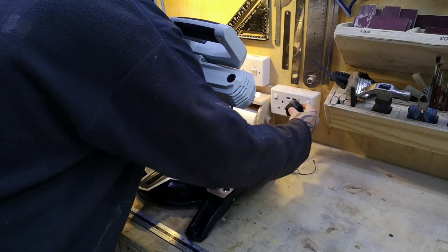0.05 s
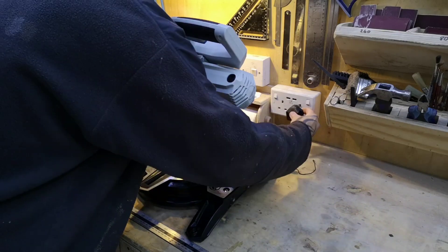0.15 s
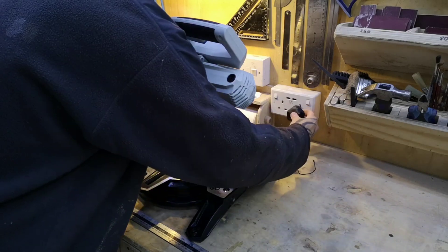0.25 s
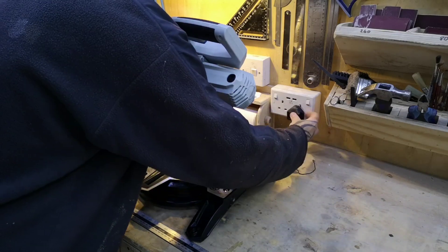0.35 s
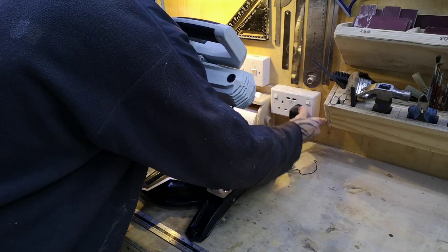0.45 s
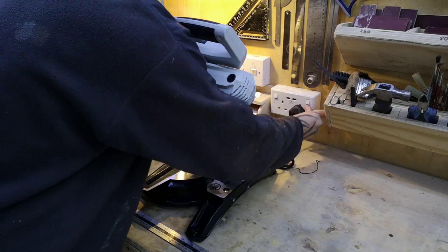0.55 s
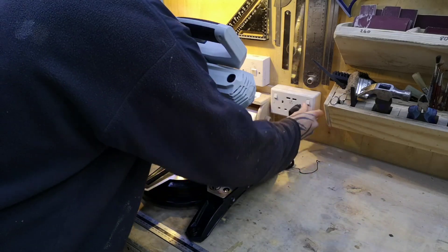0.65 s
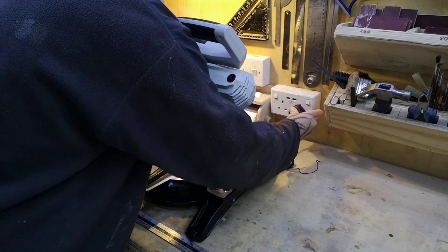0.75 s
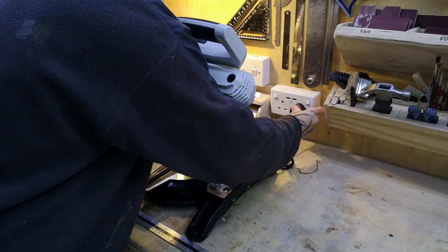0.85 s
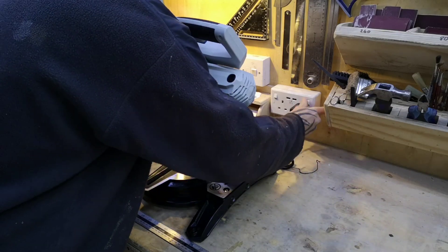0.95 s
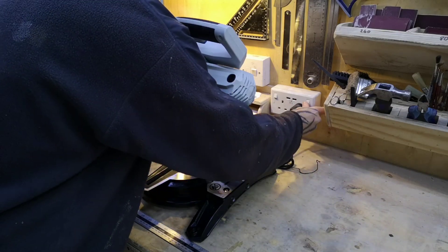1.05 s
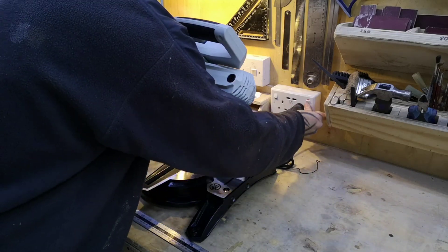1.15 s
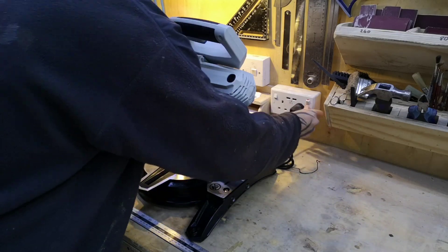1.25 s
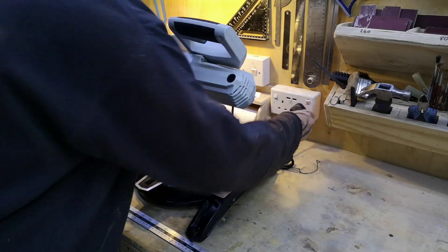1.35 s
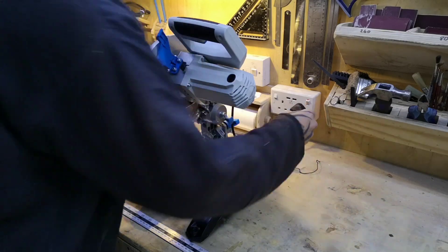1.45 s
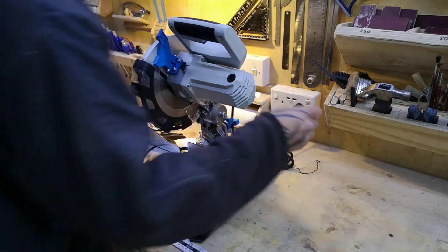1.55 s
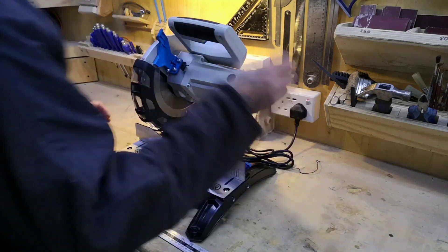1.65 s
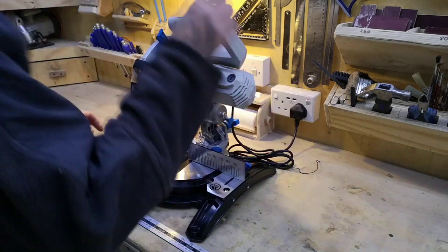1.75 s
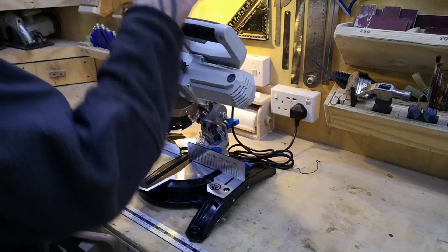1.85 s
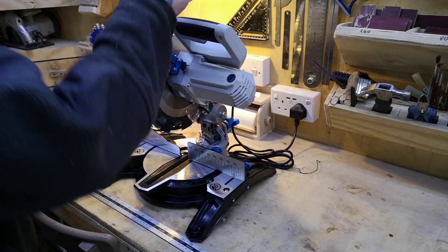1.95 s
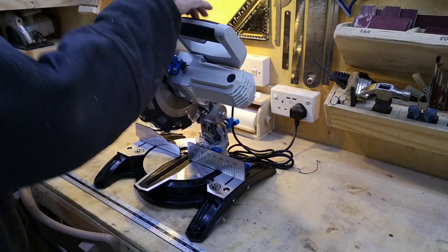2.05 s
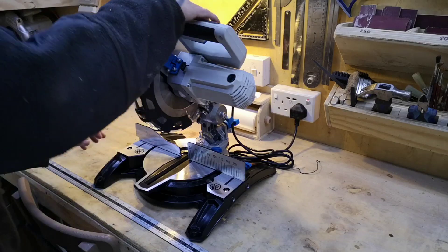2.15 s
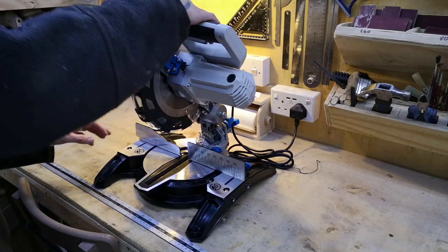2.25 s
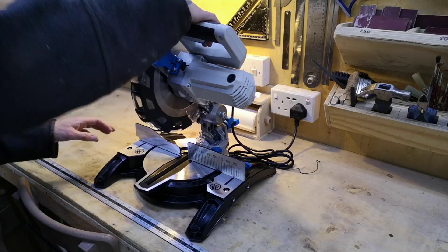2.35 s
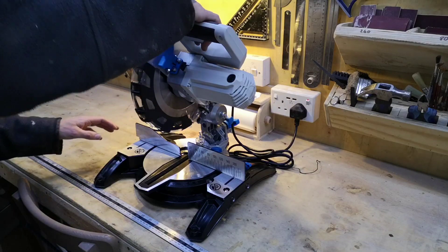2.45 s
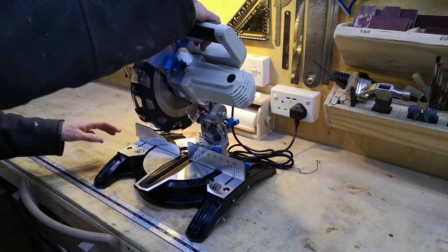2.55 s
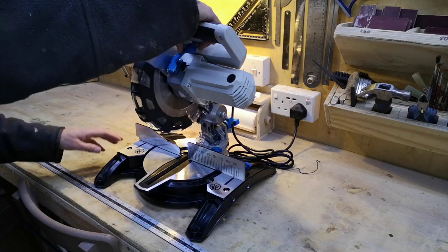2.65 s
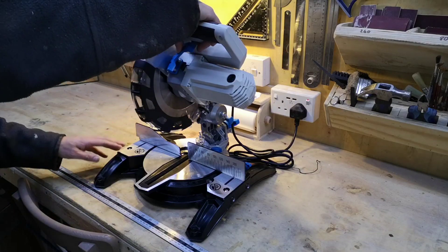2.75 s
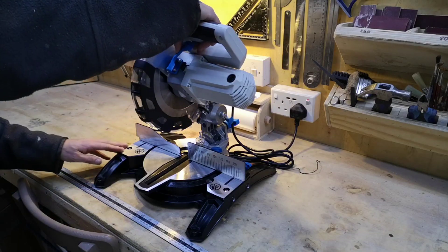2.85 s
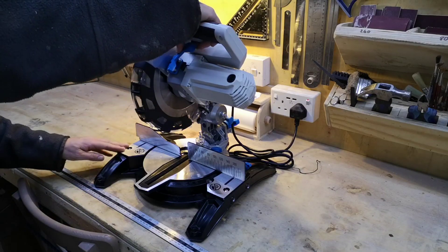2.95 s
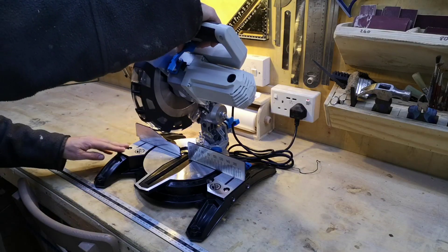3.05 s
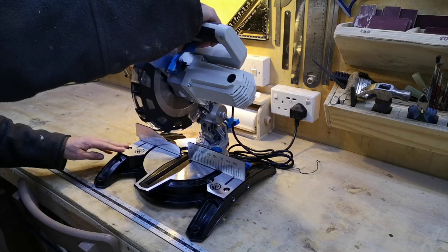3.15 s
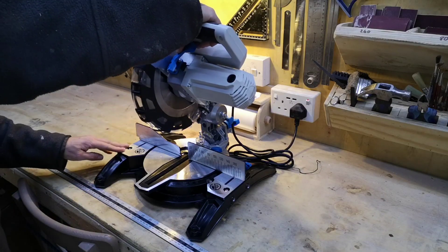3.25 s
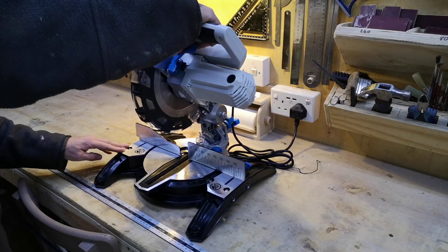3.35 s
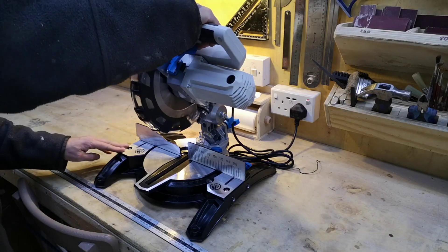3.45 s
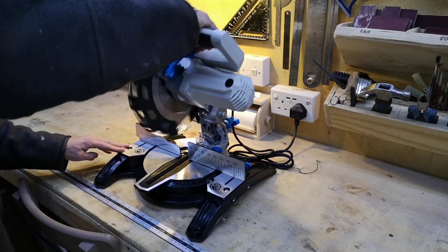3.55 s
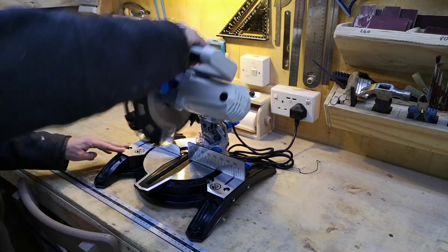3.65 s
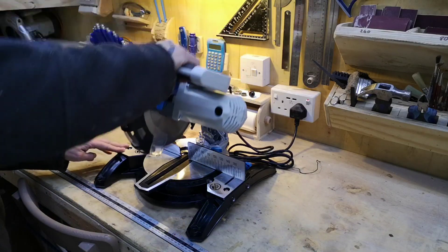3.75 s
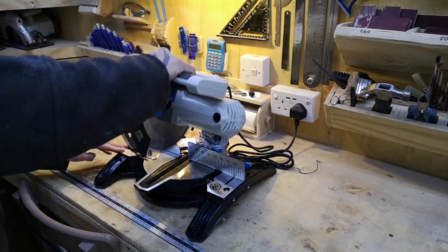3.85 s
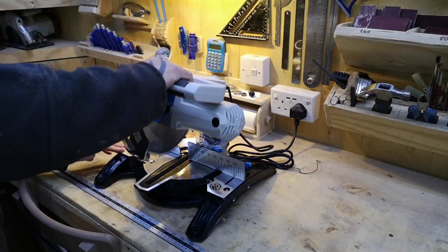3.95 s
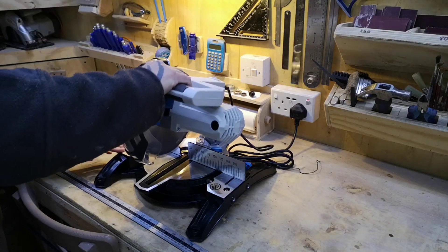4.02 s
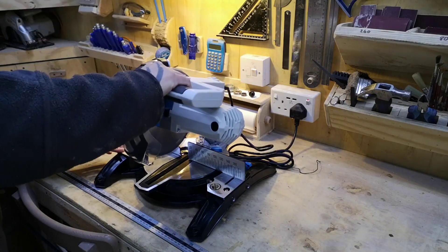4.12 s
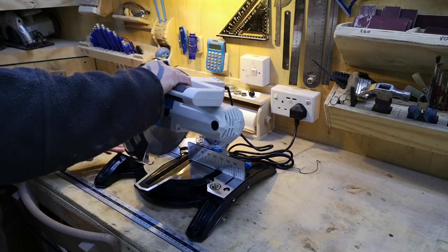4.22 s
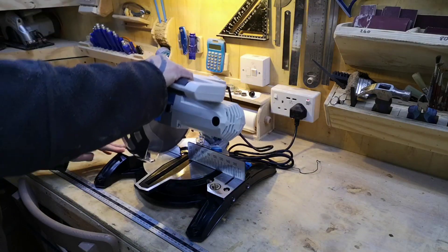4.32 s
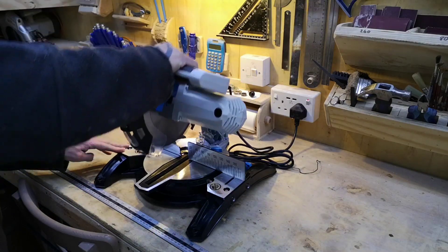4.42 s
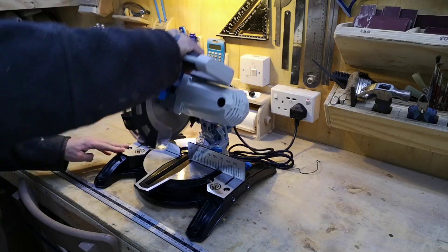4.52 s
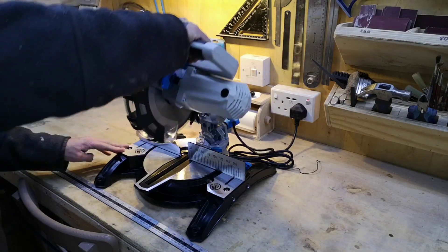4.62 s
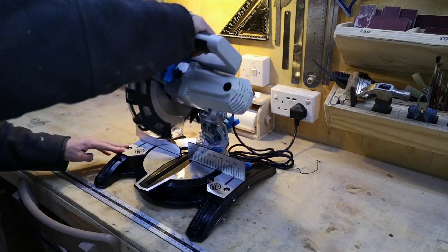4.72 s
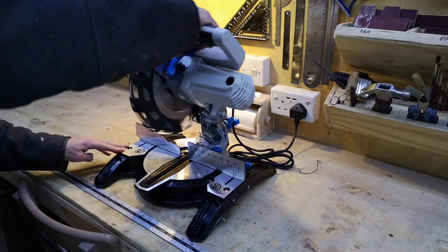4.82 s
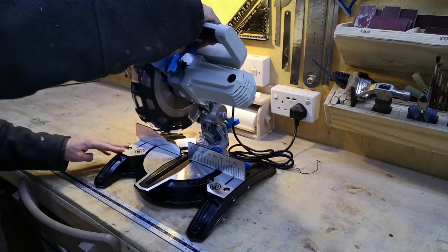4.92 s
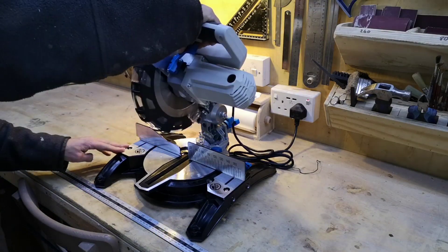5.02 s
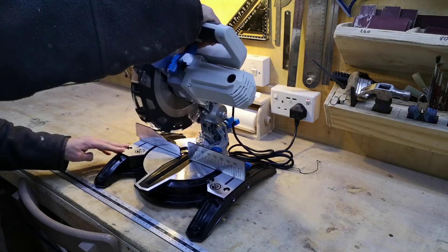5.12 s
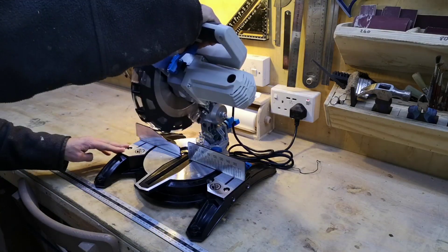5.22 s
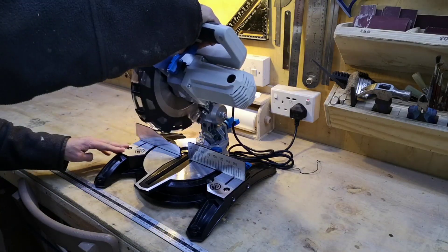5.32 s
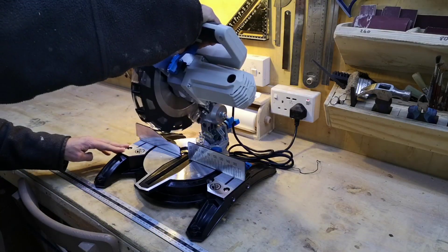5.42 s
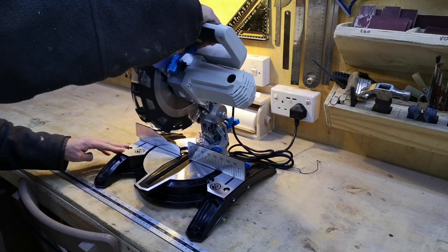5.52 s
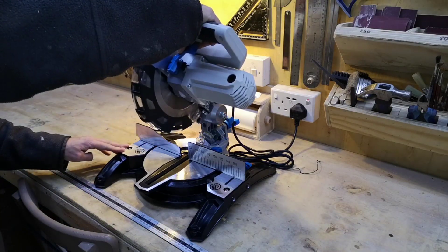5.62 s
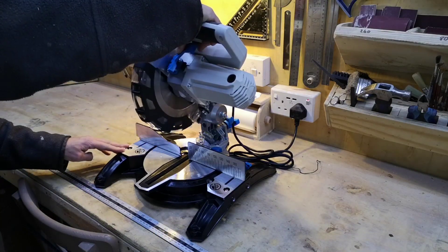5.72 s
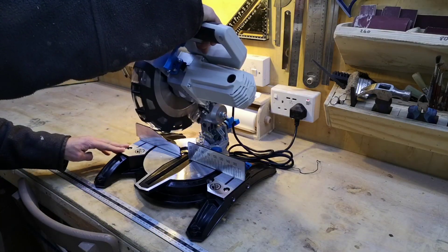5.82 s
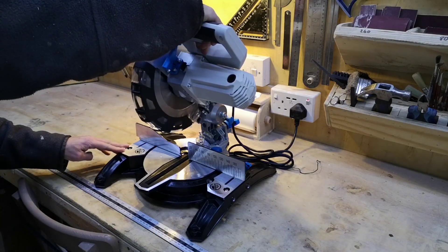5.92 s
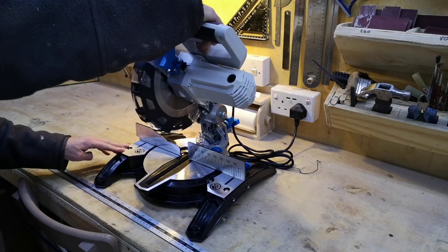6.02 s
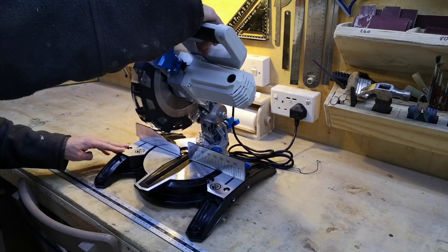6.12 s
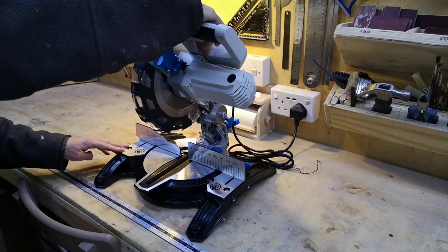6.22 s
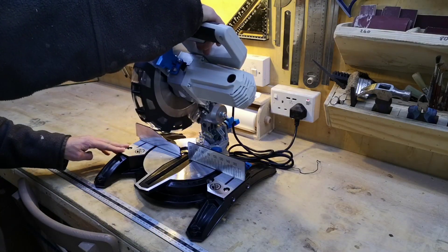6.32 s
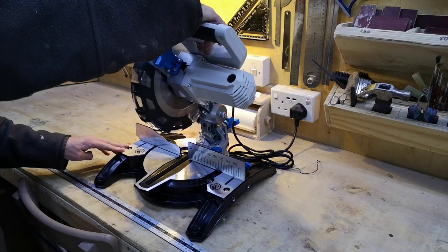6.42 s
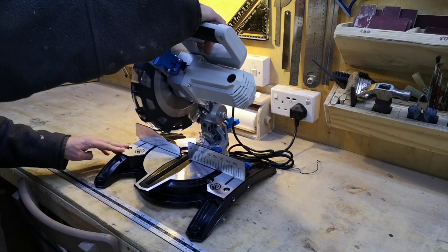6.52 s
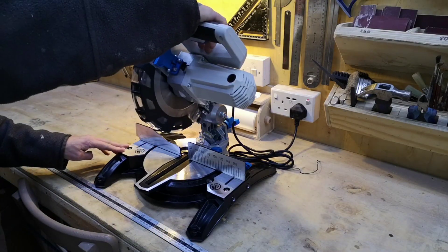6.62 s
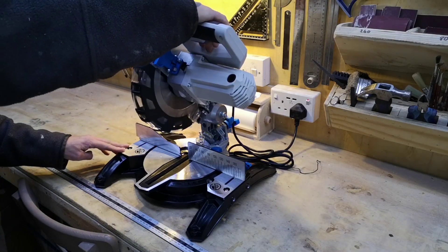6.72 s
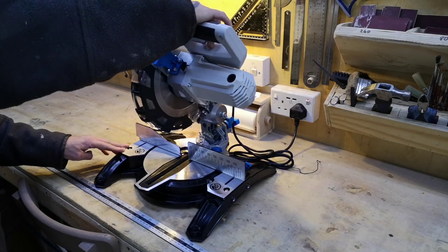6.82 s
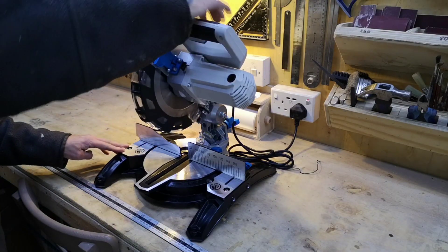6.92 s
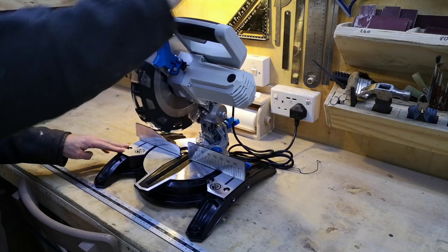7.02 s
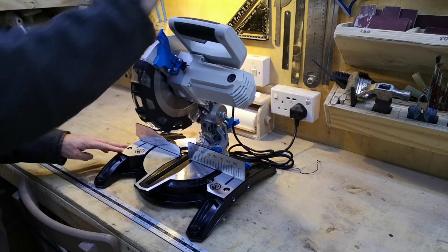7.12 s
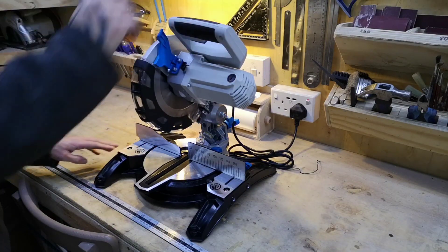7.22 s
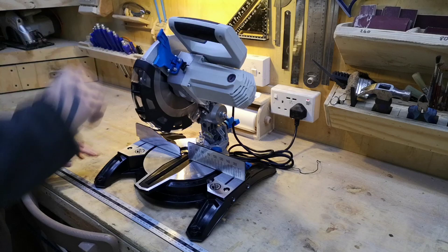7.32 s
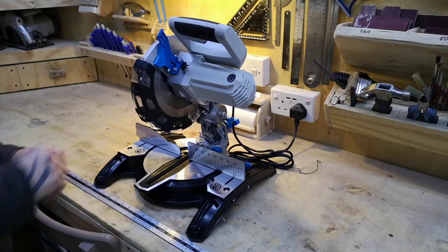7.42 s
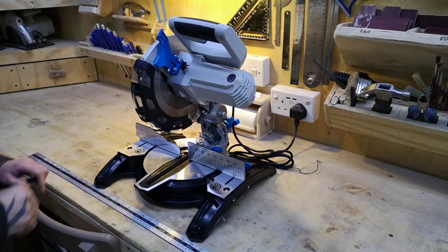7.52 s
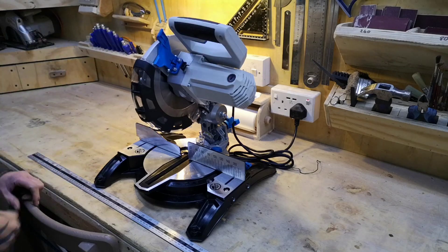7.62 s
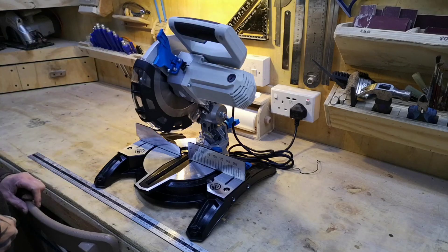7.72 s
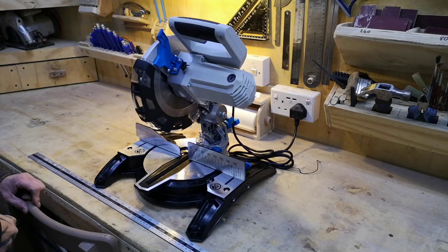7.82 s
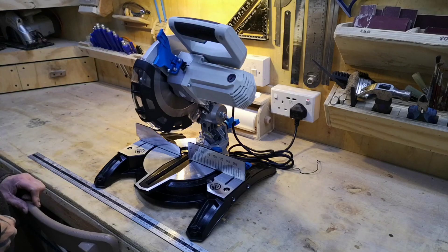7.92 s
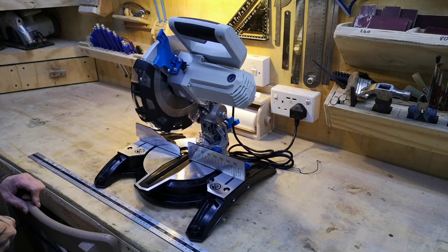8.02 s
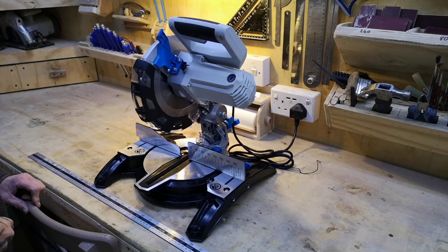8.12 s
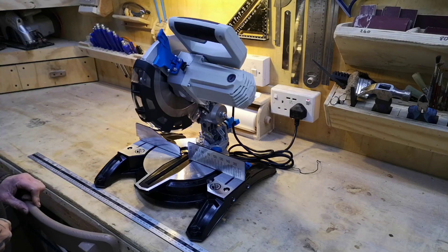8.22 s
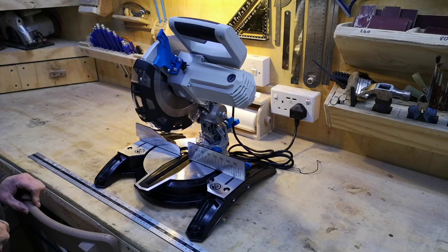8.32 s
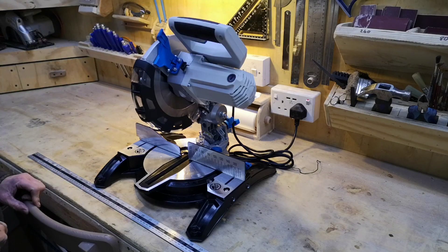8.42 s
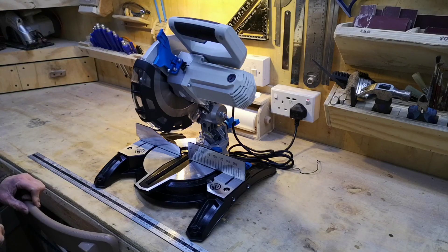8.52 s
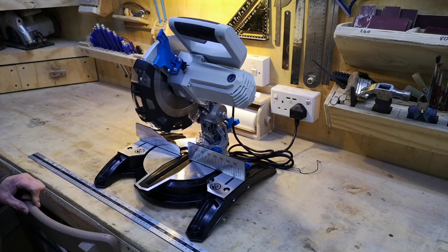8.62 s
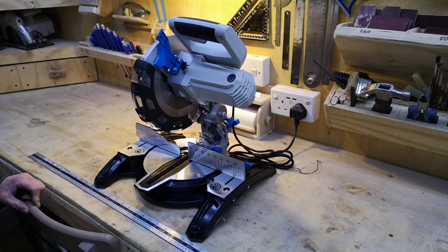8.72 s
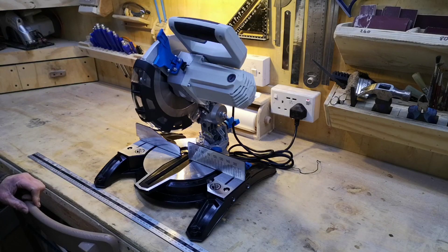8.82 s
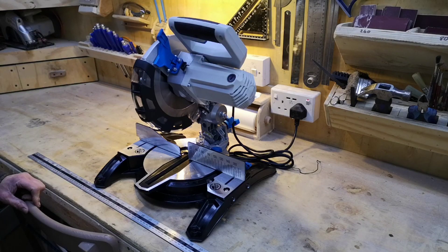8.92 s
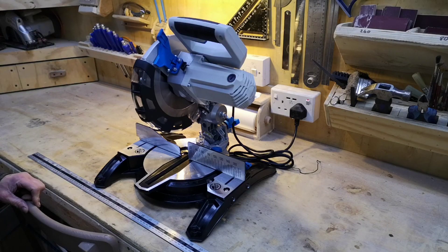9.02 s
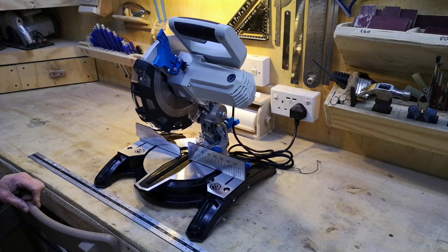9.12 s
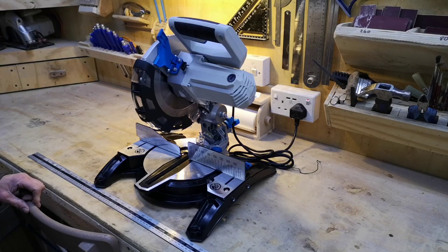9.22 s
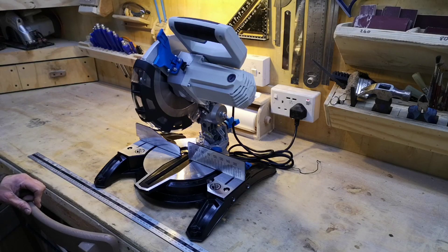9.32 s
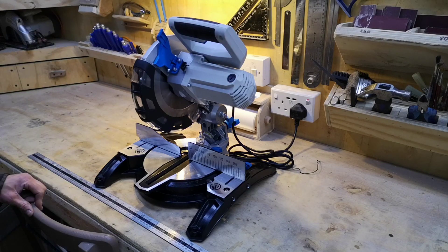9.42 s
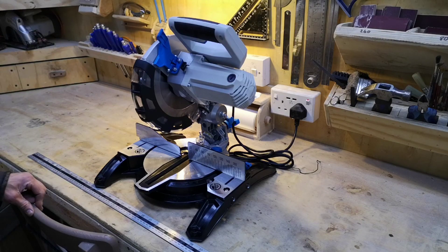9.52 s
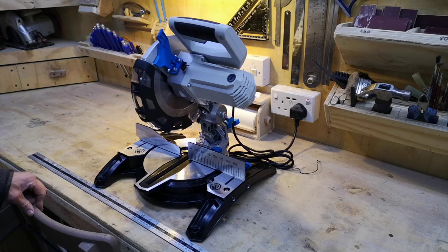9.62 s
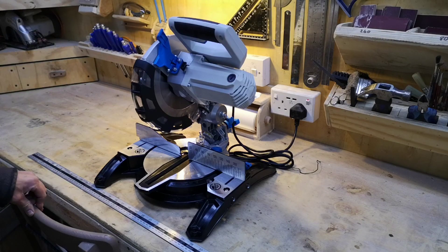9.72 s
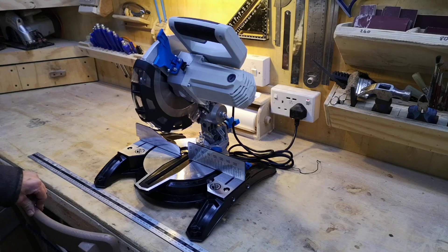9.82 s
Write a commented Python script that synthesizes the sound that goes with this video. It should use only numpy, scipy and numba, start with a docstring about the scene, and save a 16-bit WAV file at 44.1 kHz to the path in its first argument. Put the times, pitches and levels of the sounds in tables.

```python
"""A sleeve rustles and a plug scrapes and knocks into a wall socket above a wooden workshop bench.
The socket's switch snaps over; a mitre saw starts with a clack, runs free and coasts down.
Its armature drives the blade through a 6:38 gear: the gear teeth whine and clatter, loose parts rattle,
the fan rushes and imbalance shakes the bench. The blade teeth whistle as the saw slows."""
import sys
import numpy as np
from scipy import signal
from scipy.fft import rfft, irfft, next_fast_len
from scipy.io import wavfile
from scipy.ndimage import uniform_filter1d
from numba import njit

SR = 44100
rng = np.random.default_rng(int(sys.argv[2]) if len(sys.argv) > 2 else 0)


def master_out(mix):
    """Clip the mix to full scale and print it as 16-bit PCM to the path in sys.argv[1]."""
    frames = np.transpose(np.atleast_2d(mix))
    ceiling = np.clip(frames, -1, 1)
    pcm = np.round(ceiling * 32767).astype(np.int16)
    wavfile.write(sys.argv[1], SR, pcm)


N = 434826
T = np.arange(N) / SR


def undb(db):
    return 10 ** (np.asarray(db) / 20)


def unit(x):
    """Scale to rms 1."""
    return x / np.sqrt(np.mean(x ** 2))


def noise(*rows):
    return rng.standard_normal((*rows, N))


def columns(table, at=T):
    """Interpolate each later column along the first, by default over time."""
    axis, *rest = np.transpose(table)
    return [np.interp(at, axis, column) for column in rest]


def colour(x, points):
    """Shape by a spectrum through (Hz, dB) points."""
    hz, db = np.transpose(points)
    size = next_fast_len(N)
    bins_hz = np.arange(size // 2 + 1) * SR / size + 1
    gain = undb(np.interp(np.log(bins_hz), np.log(hz), db))
    return irfft(rfft(x, size) * gain, size)[..., :N]


def ring(x, modes):
    """Sum of resonances, each (Hz, width in Hz, gain in dB)."""
    return sum(undb(db) * signal.lfilter(*signal.iirpeak(hz, hz / width, SR), x)
               for hz, width, db in modes)


def walk(rate_hz):
    """Smooth random wander, rms 1."""
    hold = int(SR / rate_hz)
    steps = np.repeat(rng.standard_normal(N // hold + 1), hold)
    return unit(uniform_filter1d(uniform_filter1d(steps, hold), hold)[:N])


@njit
def bandpass(x, hz, width_hz):
    """State-variable band-pass, gain 1 at its moving centre."""
    y, band, low = np.empty(len(x)), 0., 0.
    for i in range(len(x)):
        g, damping = np.tan(np.pi * hz[i] / SR), width_hz[i] / hz[i]
        v = (band + g * (x[i] - low)) / (1 + g * (g + damping))
        band, low, y[i] = 2 * v - band, low + 2 * g * v, damping * v
    return y


def blurred_tone(hz, blur, core):
    """Noise band of width blur * hz around a wavering sine; one for each of two radiating faces."""
    phase = 2 * np.pi * np.cumsum(hz * (1 + 0.35 * blur * walk(150))) / SR
    sine = np.sin(phase + 2 * np.pi * rng.random((2, 1)))
    bands = [bandpass(bandpass(n, hz, blur * hz), hz, blur * hz) for n in noise(2)]
    return core * sine + np.array([unit(band / np.sqrt(hz)) for band in bands])


# Each row: frequency in Hz, noise density in dB.
ROOM_TONE_SPECTRUM = [(12, -5), (20, -6), (43, -2), (61, -11.5), (97, -17), (135, -10.5), (151, -14),
                      (270, -21), (445, -32.5), (2690, -30), (4200, -41.5), (5090, -37.5), (15000, -52)]


def room_tone():
    """The still room: bass alike left and right, treble unrelated."""
    mid = colour(noise(), ROOM_TONE_SPECTRUM)
    side = colour(colour(noise(), ROOM_TONE_SPECTRUM), [(100, -16), (500, 1)])
    return undb(-53.5) * np.array([mid + side, mid - side]) / np.sqrt(np.mean(mid ** 2))


# Each row: start in seconds, length in seconds, hiss in dB, creak pitch in Hz, creak in dB.
SLEEVE_MOVES = [(0.047, 0.13, -60, 266.6, -42.5), (1.75, 0.034, -72, 410, -55),
                (1.883, 0.054, -58.5, 620, -63), (2.198, 0.078, -49, 532, -55),
                (2.48, 0.047, -70, 617, -59), (2.728, 0.074, -61.5, 600, -77)]


def rustles():
    """Sleeve cloth hisses and the gripped handle creaks faintly."""
    hiss = unit(colour(noise(), [(300, -22), (1500, 6), (4000, 1), (8000, -2), (13000, -22)]))
    out = np.zeros(N)
    for start_s, length_s, hiss_db, creak_hz, creak_db in SLEEVE_MOVES:
        arch = np.sin(np.pi * np.clip((T - start_s) / length_s, 0, 1)) ** 0.59
        creak = np.sin(2 * np.pi * creak_hz * T + 4.9 * walk(56))
        out += arch * (undb(hiss_db) * hiss + undb(creak_db) * creak)
    return out


# Each row: time of the hardest push in seconds, level in dB.
PIN_DRAGS = [(0.14, -45), (0.44, -35), (1.078, -43)]
# Each row: socket box mode in Hz, width in Hz, gain in dB.
SOCKET_MODES = [(250, 130, -14), (286, 56, -2), (363, 29, 1), (400, 52, -4), (487, 210, -30),
                (710, 260, -11), (850, 130, -21), (1160, 210, -22), (1450, 300, -14), (1940, 110, -30),
                (2500, 120, -20)]


def pin_drag(grit, rise_db_per_s=87, fall_db_per_s=101):
    """The pins grate over the socket face and ring its box."""
    pressure = sum(undb(db - np.maximum(rise_db_per_s * (peak_s - T), fall_db_per_s * (T - peak_s)))
                   for peak_s, db in PIN_DRAGS)
    return unit(ring(grit, SOCKET_MODES)) * pressure * undb(5.2 * walk(59.7))


# Plug, switch and handle. Each row: start in seconds, then blow, wall boom, edge and tick in relative dB.
HAND_KNOCKS = [(0.145, -59, -48, -35.5, -34), (0.226, -16, -41, -24, -34), (0.249, -31, -42, -50, -51),
               (0.34, -11.5, -48, -18, -35), (0.355, -20, -50, -46, -55), (0.368, -28, -39, -46, -48),
               (0.383, -21, -35, -47, -57), (0.467, -21.5, -35, -40, -60), (0.478, -32, -50, -39, -60),
               (0.5, -22.5, -28, -22, -30), (0.515, -24, -29.5, -22.5, -31), (0.551, -38, -32, -40, -46),
               (0.578, -24, -31, -31, -35), (0.63, -21.5, -34, -41, -38.5), (0.661, -54, -39, -55, -54),
               (0.79, -68, -49, -67, -70), (0.886, -29, -42, -58, -70), (0.902, -28, -59, -50, -56),
               (0.914, -12, -59, -30, -34), (0.927, -13.5, -25.5, -32, -32), (0.956, -37, -30, -35, -46),
               (0.996, -29, -29.5, -52, -47), (1.082, -62, -39, -55, -58), (1.2, -33.5, -52, -29, -33),
               (1.316, -44, -54, -60, -58), (1.372, -43.5, -64, -70, -56), (1.456, -56, -71, -52, -56),
               (2.197, -47, -54, -58, -42), (2.308, -52, -48.5, -61, -56), (2.984, -65, -68, -64, -56),
               (3.037, -58, -70, -44, -58)]
# Each row: wall mode in Hz, width in Hz, gain in dB.
WALL_MODES = [(32, 2.5, 9), (41.7, 2.2, 1.5), (52.8, 3.2, -1), (91, 7.5, -5.5), (143, 32, -6.5),
              (182, 14, -2)]


def knocks(grit, rise_s=0.0018, scrape_s=0.0093):
    """Gritty blows ring the socket box, click with a bright edge and a tick, and boom in the wall."""
    blow, edge, tick, thump, contact = np.zeros((5, N))
    for start_s, blow_db, boom_db, edge_db, tick_db in HAND_KNOCKS:
        age_s = np.maximum(T - start_s, 0)
        fade = (1 - np.exp(-age_s / rise_s)) * np.exp(-age_s / scrape_s)
        blow += undb(blow_db) * fade
        edge += undb(edge_db) * fade
        tick += undb(tick_db) * fade ** 2
        contact[int(start_s * SR)] += undb(blow_db - 16)
        thump[int(start_s * SR)] += undb(boom_db)
    rap = np.convolve(contact, np.hanning(110) / 1.5)[:N]
    box = 20 * ring(rap + blow * (0.2 + 0.74 * grit), SOCKET_MODES)  # pushes one way, grates as it slides
    bright = unit(colour(noise(), [(450, -40), (1000, 2.5), (2500, -0.5), (3600, -5), (4600, -7.5),
                                   (7000, -14.5), (10000, -34)]))
    sharp = unit(colour(noise(), [(5000, -33), (7800, -2), (10000, -16), (12000, -34), (15000, -34)]))
    push = np.convolve(thump, np.hanning(300) / 150)[:N]  # 7 ms: only low modes answer
    return box, edge * bright + tick * sharp, 1500 * ring(push, WALL_MODES)


def impulses(hits):
    """One-sample blows, each (seconds, dB)."""
    out = np.zeros(N)
    for start_s, db in hits:
        out[int(start_s * SR)] = undb(db)
    return out


# Each row: mode in Hz, width in Hz, gain in dB.
PIN_MODES = [(4500, 160, 1), (5130, 180, -6)]


def pin_ping(start_s=0.16):
    """A plug pin touches metal and rings."""
    return ring(impulses([(start_s, 3.5)]), PIN_MODES)


# Each row: mode in Hz, width in Hz, gain in dB.
ROCKER_MODES = [(2730, 300, -4), (7300, 500, -16), (9300, 450, 0), (11500, 600, -9)]


def switch_snap(start_s=1.202):
    """The socket's rocker switch snaps over."""
    return ring(impulses([(start_s, 0)]), ROCKER_MODES)


def trigger_arc(grind, start_s=3.081, decay_s=0.018):
    """The trigger switch's contacts close with a short crackle."""
    return (T > start_s) * np.exp(-np.maximum(T - start_s, 0) / decay_s) * undb(-21) * grind


ON_S, OFF_S, FULL_HZ = 3.085, 5.825, 489  # trigger pulled, trigger released, full armature speed
PINION_TEETH, WHEEL_TEETH, BLADE_TEETH, FAN_VANES = 6, 38, 72, 27
MAINS_HZ, TOP_HZ = 50, 15200
SINCE_ON_S = np.maximum(T - ON_S, 0)
# Each row: speed still missing at the trigger in Hz, time constant in seconds.
RUN_UP_LAGS = [(186, .05), (243, .335)]


def armature_speed(drag_s=1.82, friction_hz=20.5, brake_hz=14, brake_s=0.15):
    """Turns a second: a quick and a slow run-up; then a quick loss and a coast on drag and friction."""
    driven = FULL_HZ - sum(missing_hz * np.exp(-SINCE_ON_S / lag_s) for missing_hz, lag_s in RUN_UP_LAGS)
    free_s = np.maximum(T - OFF_S, 0)
    coast = (FULL_HZ + friction_hz - brake_hz) * np.exp(-free_s / drag_s) - friction_hz
    return np.where(T < OFF_S, driven, coast + brake_hz * np.exp(-free_s / brake_s))


def inrush_buzz():
    """The stalled motor draws a heavy current and buzzes briefly at multiples of the mains."""
    swell = undb(-18.5) * (SINCE_ON_S / 0.13) ** 2 * np.exp(1 - (SINCE_ON_S / 0.12) ** 2) / 3
    return swell * sum(undb(db + 2.6 * walk(18)) * np.sin(2 * np.pi * k * MAINS_HZ * T + 0.93 * walk(25))
                       for k, db in enumerate([-8, 6, 1, 3.5, -1, -5, -6.5], 1))


# Each row: start in seconds, relative level in dB.
TOOTH_SLAMS = [(3.0915, 29), (3.094, 31), (3.1035, 27), (3.113, 23)]
# Each row: mode in Hz, width in Hz, gain in dB.
GEAR_CASE_MODES = [(1067, 21, 9.5), (1164, 26, 6), (1300, 160, 1.5), (1740, 220, 0), (2280, 440, -5),
                   (3050, 400, 1.5)]


def gear_clack():
    """The teeth slam together as the torque arrives and the gear case rings."""
    slams = np.convolve(impulses(TOOTH_SLAMS), np.hanning(16) / 7)[:N]
    return ring(slams, GEAR_CASE_MODES) * np.array([[1], [0.5]])


# Each row: mode in Hz, width in Hz, gain in dB.
HOUSING_MODES = [(1000, 48, -8), (1250, 41, -40), (1693, 700, -0.5), (2667, 230, -6.5), (3400, 16, -8),
                 (3600, 46, -50), (5840, 84, -16), (5900, 38, -62), (6940, 150, 2.5), (7590, 210, 0.5),
                 (9250, 39, 9)]


def housing(x):
    """Casting and guard add their resonances to the sound passing through."""
    return 1.09 * x + 0.96 * ring(x, HOUSING_MODES)


# Each row: time in seconds, drone in dB against the clatter.
CASTING_LEVELS = [(3.5, -11), (3.9, -13), (4.1, -5), (4.22, -4.5), (4.3, -22), (4.5, -7.5), (4.65, -17),
                  (4.85, -9), (5.05, -16), (5.22, -2), (5.4, -27), (5.7, -24), (5.85, -30)]
# Each row: centre in Hz, width in Hz, gain in dB.
CASTING_BAND = [(1870, 470, 0)]


def gear_clatter(grind, clatter_db):
    """The gears grind, and the casting drones as the head is swung down and up."""
    drone = unit(ring(ring(noise(2), CASTING_BAND), CASTING_BAND))
    return (grind + undb(columns(CASTING_LEVELS)[0]) * drone) * undb(clatter_db + 0.91 * walk(15))


# Each row: time in seconds, whine in dB against the clatter, before radiation.
MESH_LEVELS = [(3.09, 26), (3.15, -7), (3.27, -6), (3.42, -7), (3.6, -3.5), (3.75, -7), (3.87, -0.5),
               (4.05, -13), (4.2, -4.5), (4.35, -4), (4.47, -26), (4.65, -9), (4.8, -18), (5.0, -23),
               (5.79, -20), (5.82, -1), (5.92, 3), (6.1, 3.5), (6.4, 2.5), (6.7, -1), (7.0, -4),
               (7.6, -6.5), (8.2, -9.5), (9.86, -18)]
# Each row: frequency in Hz, radiation gain for tones in dB.
TONE_RADIATION = [(400, -36), (900, -10.5), (1500, -10.5), (3200, -2.5), (4050, -9), (4500, -24),
                  (9000, -42)]


def gear_whine(speed_hz, clatter_db):
    """A tone at the tooth-mesh rate; it flares when the drive lets go."""
    mesh = blurred_tone(PINION_TEETH * speed_hz, blur=np.where(T < OFF_S, 0.13, 0.15), core=0.66)
    return housing(colour(undb(clatter_db + columns(MESH_LEVELS)[0]) * mesh, TONE_RADIATION))


# Each row: time in seconds, rattle in dB against the clatter.
RATTLE_LEVELS = [(3.1, -7.5), (5.8, -10), (6.6, -6), (7.4, -4.5), (8.0, -6.5), (8.5, -2), (9.0, 1.5),
                 (9.86, 0)]
# Each row: guard or fence mode in Hz, width in Hz, gain in dB.
LOOSE_MODES = [(1055, 17, 5), (1284, 60, 6), (1830, 190, -1.5), (2180, 34, 0), (2726, 230, 3.5),
               (2843, 55, 1.5), (3305, 270, 4.5), (3830, 150, 6), (5200, 60, -1), (5650, 110, 2.5),
               (7150, 80, 2), (7500, 280, -14)]


def loose_rattle(speed_hz, clatter_db, strikes_per_tooth=5):
    """Loose parts are struck unevenly and ring at their own pitches."""
    strike_rate_hz = strikes_per_tooth * PINION_TEETH * speed_hz
    strikes = noise(2) * (rng.random(N) < strike_rate_hz / SR) / np.sqrt(speed_hz)
    rattle = colour(ring(strikes, LOOSE_MODES), [(500, 4), (900, 2), (8000, -2), (12000, -55)])
    return unit(rattle) * undb(clatter_db + columns(RATTLE_LEVELS)[0])


# Each row: frequency in Hz, noise density in dB.
FAN_SPECTRUM = [(2350, -19.5), (4000, -4), (4350, -4.5), (5740, -1.5), (6310, -11), (6820, -2), (7710, 3.5),
                (8520, -5), (9740, -4), (11100, -18), (13500, -24), (15100, -33)]


def fan(speed_hz, clatter_db, build_s=0.25, rush_knee_hz=57.6, vane_knee_hz=200):
    """Rushing air, a top sizzle and a vane-passing tone; all die away below their knee speeds."""
    speed_share = speed_hz / FULL_HZ
    flow = np.clip(SINCE_ON_S / build_s, 0.03, 1) / np.hypot(1, (rush_knee_hz / speed_hz) ** 2)
    sizzle = unit(colour(noise(2), [(9000, -17), (11500, 5), (14000, 1), (15500, -32)]))
    sizzle *= undb(-14.5) * speed_share ** 1.7
    rush = (unit(colour(noise(2), FAN_SPECTRUM)) + sizzle) * flow * undb(clatter_db - 3 + 1.1 * walk(11))
    vane_gain = undb(-36 + walk(28)) * speed_share ** 0.5 / np.hypot(1, (vane_knee_hz / speed_hz) ** 3)
    return rush + vane_gain * blurred_tone(np.minimum(FAN_VANES * speed_hz, TOP_HZ), blur=0.02, core=0.5)


def near_speed(speed_hz, centre_hz, octaves):
    """Bell-shaped weight, 1 at the centre speed."""
    return np.exp(-(np.log2(speed_hz / centre_hz) / octaves) ** 2)


def throb_gain(speed_hz, armature_rad, blade_rad, rock_hz=40.3):
    """Unloaded teeth knock harder once a turn of each wheel; at low speed the bench rocks as well."""
    rocking = unit(ring(noise(), [(rock_hz, 9, 0)]))
    blade_db = 1.46 * near_speed(speed_hz, 266, octaves=1) * np.cos(blade_rad)
    armature_db = 1.7 * near_speed(speed_hz, 106, octaves=0.47) * np.cos(armature_rad)
    bench_db = 1.72 * near_speed(speed_hz, 71, octaves=0.93) * rocking
    return undb(blade_db + armature_db + bench_db + 0.72 * walk(45))


# Each row: armature speed in Hz, then blade imbalance, armature imbalance and guard drone in dB.
SHAKE_BY_SPEED = [(35, -41, -49.5, -56), (50.3, -40.5, -44, -56), (67, -38, -41, -46),
                  (87.5, -41, -46, -52), (100, -30, -41, -68), (125, -50, -36.5, -61),
                  (164, -38.5, -40, -51.5), (189, -33.5, -38, -50), (266, -39.5, -42, -50),
                  (340, -35, -42.5, -52), (400, -36.5, -35, -53), (452, -46, -35.5, -64),
                  (480, -42.5, -49, -53)]
# Each row: time in seconds, deep rumble in dB, rumble in dB.
RUMBLE_LEVELS = [(3.1, -36, -44), (3.25, -33, -38), (3.4, -30, -39), (3.5, -35, -39), (3.75, -37.5, -36.5),
                 (4.21, -43, -36.5), (4.75, -41, -35), (5.3, -44, -39.5), (5.9, -52, -43.5),
                 (6.15, -50, -39), (6.5, -39, -44.5), (7.0, -37.5, -34.5), (7.3, -31, -35.5),
                 (8.05, -40, -38), (8.31, -32, -40.5), (8.84, -39, -47), (9.31, -35, -50), (9.5, -37, -42),
                 (9.86, -34, -47)]
# Each row: mode in Hz, width in Hz, gain in dB.
BENCH_MODES = [(34.7, 4, 4.5), (48.7, 10.1, 11), (74.8, 9.2, 6), (126.5, 4.9, 3.5), (145, 9.6, -4.5),
               (204, 26, -32), (334, 20, -19), (430, 36, -18)]


def bench_shake(speed_hz, armature_rad, blade_rad, settle_s=0.12):
    """Blade and armature imbalance drive the bench modes; the bench rumbles and the guard drones."""
    blade_db, armature_db, guard_db = columns(SHAKE_BY_SPEED, at=speed_hz)
    deep_db, rumble_db = columns(RUMBLE_LEVELS)
    overtone = 4 * np.exp(-speed_hz / 30) * np.sin(2 * armature_rad)
    force = undb(armature_db) * (np.sin(armature_rad) + overtone)
    force += undb(blade_db) * (np.sin(blade_rad) + 0.4 * np.sin(2 * blade_rad))
    force *= 1 - np.exp(-SINCE_ON_S / settle_s)
    force *= undb(4 * near_speed(speed_hz, 67, octaves=1) * walk(9))  # the slow saw rocks on its feet
    shake = 0.2 * undb(blade_db) * np.sin(blade_rad) + 1.96 * ring(force, BENCH_MODES)
    for db, modes, band in [(deep_db, BENCH_MODES[:3], [(45.5, 220, 0)]),
                            (rumble_db, BENCH_MODES[3:6], [(139, 230, 0)]),
                            (guard_db, BENCH_MODES[6:], BENCH_MODES[6:])]:
        shake += undb(db + 2 * walk(3.7)) * unit(ring(ring(noise(), modes), band))
    return shake


# Each row: time in seconds, then whistle and second partial in dB against the clatter, before radiation.
WHISTLE_LEVELS = [(5.83, -50, -50), (6.3, -15, -30), (6.5, -5, -22), (6.7, -7, -18), (6.85, -12, -16),
                  (7.05, -4, -13), (7.25, -7, -12), (7.4, -10, -10), (7.55, -22, -9), (7.8, -31, -10),
                  (8.15, -18, -8), (8.3, -20, -10), (8.45, -24, -3), (8.65, -18, -9), (8.87, -18, -2),
                  (9.05, -16, -10), (9.3, -22, -12), (9.86, -26, -29)]
# Each row: mode in Hz, width in Hz, gain in dB.
BLADE_MODES = [(2713, 91, 4), (2180, 110, -7), (3510, 170, 3)]


def blade_whistle(speed_hz, grind, clatter_db):
    """The teeth of the coasting blade whistle past and the free blade rings."""
    first_db, second_db = clatter_db + np.array(columns(WHISTLE_LEVELS))
    tooth_hz = BLADE_TEETH * speed_hz * PINION_TEETH / WHEEL_TEETH
    whistle = undb(first_db) * blurred_tone(tooth_hz, blur=0.13, core=0.4)
    whistle += undb(second_db) * blurred_tone(2 * tooth_hz, blur=0.1, core=0.3)
    ringing = ring(whistle + 0.77 * undb(np.maximum(first_db, second_db)) * grind, BLADE_MODES)
    return housing(colour(whistle, TONE_RADIATION)) + ringing


# Each row: time in seconds, gear clatter in dB, left minus right in dB.
SAW_LEVEL_AND_PAN = [(3.1, -25, -1), (3.15, -13, 2), (3.29, -13, 1), (3.78, -14, 1.5), (3.87, -18, 2),
                     (4.02, -13.5, 2), (5.75, -13.5, 2), (6.05, -16.5, 1), (6.21, -15, 1),
                     (7.4, -15.5, 1.5), (7.75, -19, 6.5), (8.2, -20, 6.5), (8.35, -24.5, 1.5),
                     (9.0, -29, 2.5), (9.6, -34.5, 1), (9.86, -39.5, 1)]
# Each row: frequency in Hz, noise density in dB.
GRIND_SPECTRUM = [(150, -27), (250, -9.5), (303, -29), (594, -14.5), (697, -9), (818, -11.5), (1020, -5.5),
                  (1820, 0.5), (2720, 1.5), (4330, -5), (6260, -4.5), (7700, -6), (8480, -10),
                  (11500, -24.5), (15000, -70), (22000, -120)]


def mitre_saw():
    """Airborne sound from two faces of the saw, and the shake and buzz that go through the bench."""
    speed_hz = armature_speed()
    clatter_db, _ = columns(SAW_LEVEL_AND_PAN)
    running = np.clip(SINCE_ON_S / 0.0244, 0, 1)
    armature_rad = 2 * np.pi * np.cumsum(speed_hz * running) / SR
    blade_rad = armature_rad * PINION_TEETH / WHEEL_TEETH
    throb = throb_gain(speed_hz, armature_rad, blade_rad)
    grind = unit(housing(colour(noise(2), GRIND_SPECTRUM)))
    teeth = gear_clatter(grind, clatter_db) + gear_whine(speed_hz, clatter_db)
    teeth += blade_whistle(speed_hz, grind, clatter_db)
    rattle = throb ** 1.54 * loose_rattle(speed_hz, clatter_db)  # loose parts feel the throb more
    air = trigger_arc(grind) + gear_clack()
    air += running * (throb * teeth + rattle + fan(speed_hz, clatter_db))
    return air, running * bench_shake(speed_hz, armature_rad, blade_rad) + inrush_buzz()


def reflections(x, t60_s=0.28, treble_t60_s=0.24):
    """Dense stereo reflections of a small wooden shed; the treble dies first."""
    t = np.arange(int(0.5 * SR)) / SR
    grain = rng.standard_normal((2, len(t)))
    low = signal.lfilter(*signal.butter(2, 2500, fs=SR), grain)
    tail = (low * undb(-60 * t / t60_s) + (grain - low) * undb(-60 * t / treble_t60_s)) * (t > 0.003)
    tail /= np.sqrt(np.sum(tail ** 2, axis=1, keepdims=True))
    return signal.fftconvolve(x[None], tail, axes=1)[:, :N]


# Each row: frequency in Hz, left minus right in dB.
SIDE_SHADING = [(60, 5), (110, 21), (200, 0), (380, 1.5), (690, 2), (1270, -1), (2340, 1), (4320, 0.5),
                (6000, 3), (7900, 10), (8700, -5), (14700, -1.5)]


def place(stereo, plug_pan_db=3):
    """Lean plug and saw to the left; the right side is shaded at most frequencies."""
    pan_db = np.where(T < ON_S, plug_pan_db, columns(SAW_LEVEL_AND_PAN)[1])
    return np.array([colour(channel * undb(way * pan_db), [(hz, way * db) for hz, db in SIDE_SHADING])
                     for channel, way in zip(stereo, (0.5, -0.5))])


# Each row: frequency in Hz, gain of the saw's side signal in dB.
STEREO_SPREAD = [(60, -25), (110, -19), (200, -16), (380, -2.5), (690, 4.5), (1270, -9), (2340, -3),
                 (4320, -3.5), (7960, -2), (14700, 4)]


def scene():
    """Plug and saw in the shed, over the bench shake, the wall boom and the room tone."""
    grit = noise()
    box, clicks, wall_boom = knocks(grit)
    socket = colour(box + pin_drag(grit), [(120, -26), (220, -9), (360, -7.5), (650, -8.5),
                                           (2500, -10.5), (5000, -16), (12000, -29)])
    handling = rustles() + socket + clicks + pin_ping() + switch_snap()
    (face, flank), shake = mitre_saw()
    side = colour(flank, STEREO_SPREAD)
    saw = np.array([face + side, np.roll(face - side, 3)])  # right lags by 3 samples
    air = undb(-2) * handling + reflections(handling) + undb(-3) * saw + undb(-8) * reflections(face)
    return place(air) + shake + wall_boom + room_tone()


def record(dry):
    """Round the loudest peaks and cut the top."""
    lowpass = signal.ellip(10, 0.2, 70, TOP_HZ, fs=SR, output="sos")
    return signal.sosfilt(lowpass, np.tanh(0.76 * dry) / 0.85)


dry = scene()
out = record(dry)
master_out(out)
```